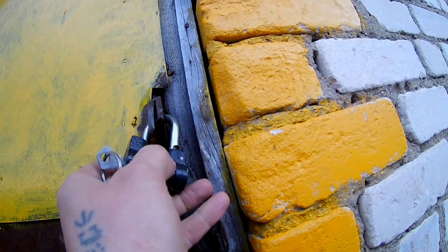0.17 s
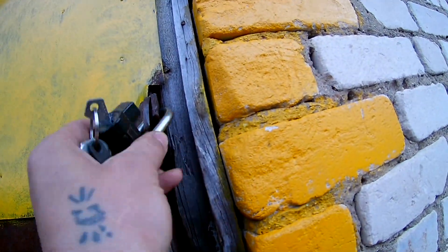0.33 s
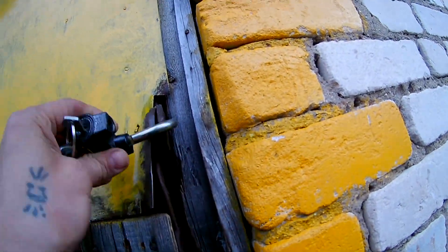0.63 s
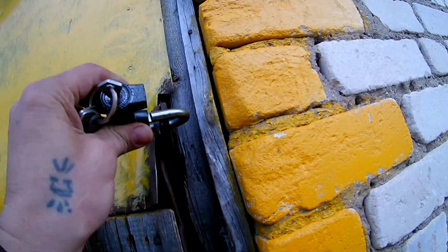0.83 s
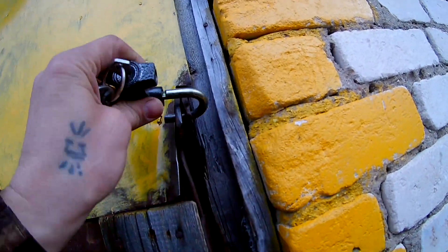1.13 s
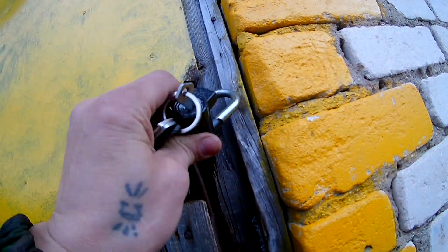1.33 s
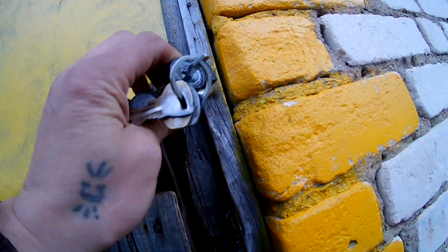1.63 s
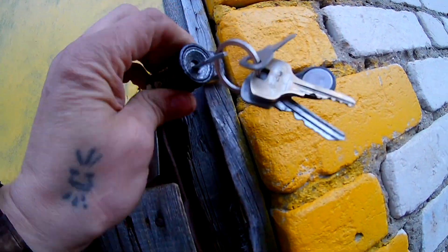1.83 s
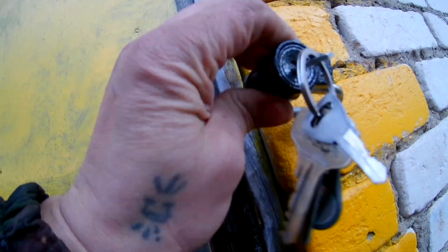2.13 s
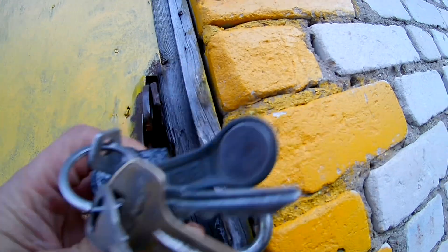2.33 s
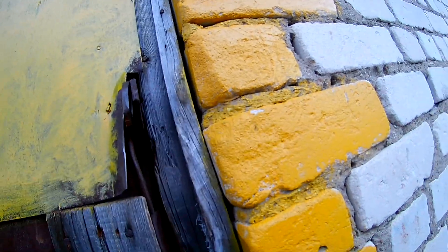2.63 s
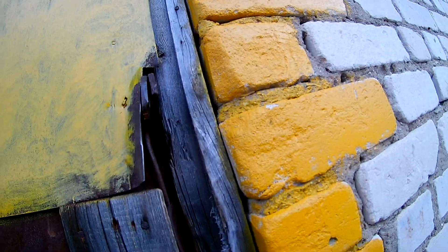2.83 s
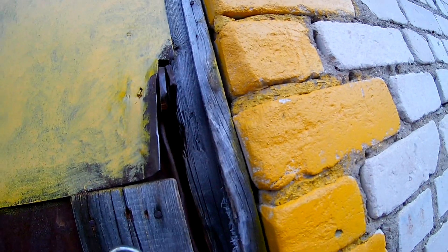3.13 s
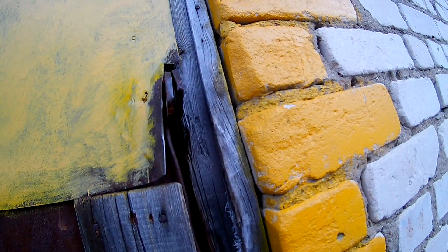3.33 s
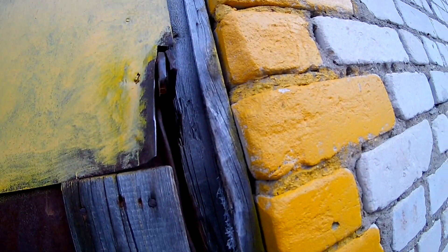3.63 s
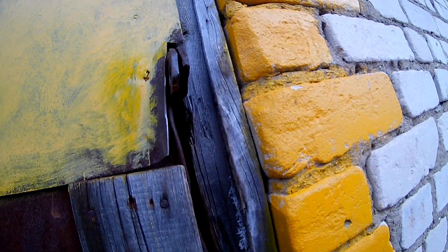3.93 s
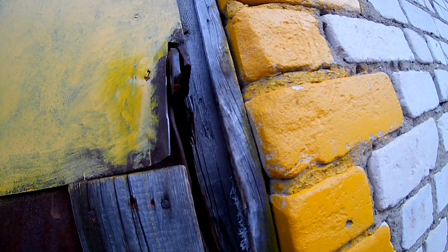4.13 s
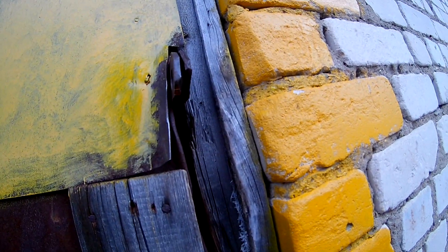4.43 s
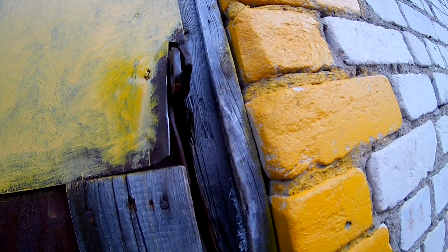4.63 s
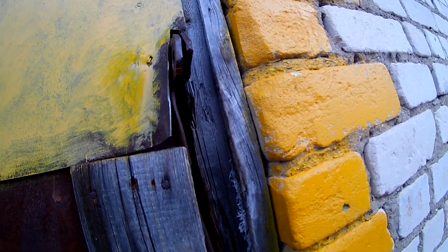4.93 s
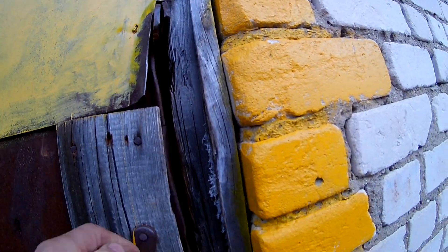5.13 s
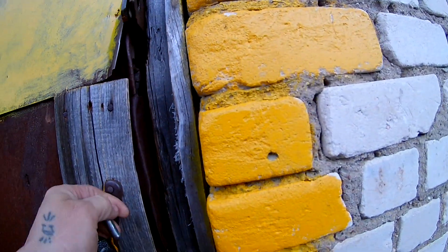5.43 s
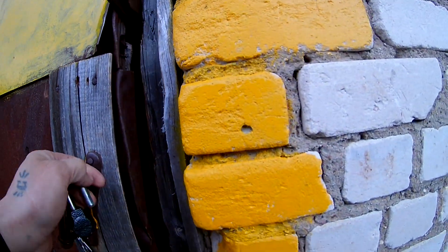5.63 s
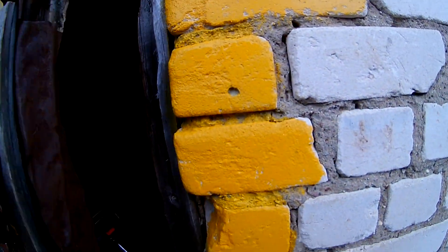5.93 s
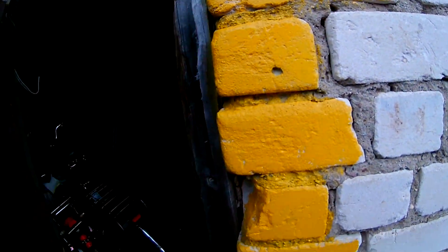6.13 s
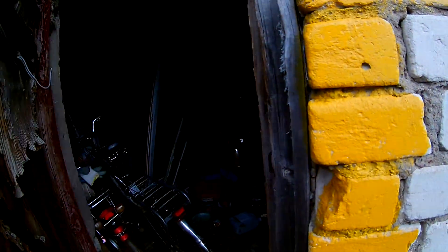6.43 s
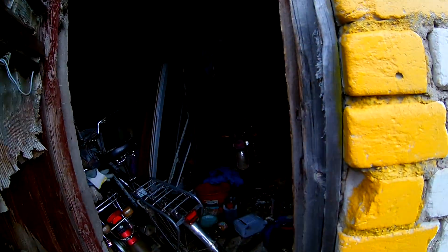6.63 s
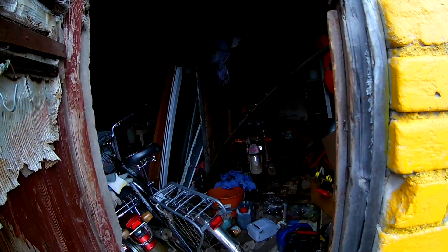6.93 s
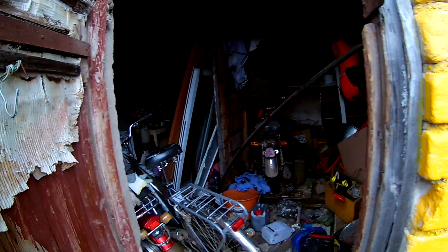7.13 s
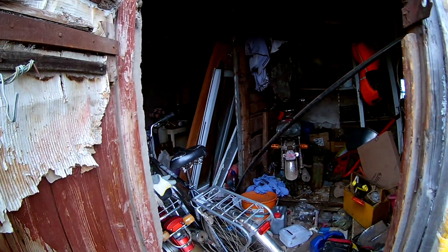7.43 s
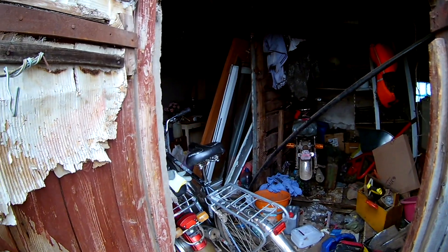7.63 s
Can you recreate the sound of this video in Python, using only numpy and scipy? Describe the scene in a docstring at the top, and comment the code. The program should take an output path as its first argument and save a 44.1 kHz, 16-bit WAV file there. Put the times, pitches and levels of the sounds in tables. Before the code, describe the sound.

A padlock clacks and rattles off a shed door's hasp as keys jingle, then the wooden door is dragged open, with gusts on the microphone.

```python
"""First a hand lifts a padlock off the metal hasp of a wooden shed door, with clacks and jingling keys.
From about 2 s the lock clacks in the hand, and its loose shackle (the metal loop) rings at times.
At 5.5 s the door is dragged open with a groan, two creaks and a bump; after 6 s the open shed echoes.
All along, a brick wall answers the knocks and gusts buffet a small boxed-in microphone,
while a faint hollow tone comes and goes over the far rush of the yard."""
import sys
import numpy as np
from scipy import signal
from scipy.fft import rfft, irfft, next_fast_len
from scipy.io import wavfile
from scipy.ndimage import uniform_filter1d, map_coordinates

SR = 44100
rng = np.random.default_rng(int(sys.argv[2]) if len(sys.argv) > 2 else 0)


def unload_wav(signal):
    """Save mono or channel-first audio to the path in sys.argv[1] as 16-bit WAV at rate SR, clipped to [-1, 1]."""
    wavfile.write(
        sys.argv[1],
        SR,
        np.round(np.clip(np.atleast_2d(signal).T, -1, 1) * 32767).astype(np.int16),
    )


N = 342657

# Knocks of lock, hasp and door: (time [s], level [dB], high clack relative to that level [dB])
HITS = [(0.161, -37, -11), (0.226, -35, -12), (0.246, -31, -7), (0.302, -31, -25), (0.332, -26.5, -18),
        (0.371, -9.5, -16), (0.398, -18, -8), (0.455, -29, -6), (0.498, -18, -13.5), (0.689, -27, -23),
        (0.738, -38.5, -30), (0.945, -45, -3), (0.961, -32, -10), (0.98, -33, -6), (0.99, -22.5, -8),
        (1.015, -12, -13.5), (1.046, -21.5, -10), (1.274, -35, -8), (1.299, -26.5, -47), (1.38, -30.5, -4),
        (1.4, -21.5, -13), (1.411, -31, 5), (1.424, -13.5, -14), (1.459, -25.5, -17), (1.615, -26, -26),
        (1.673, -22, -13), (1.696, -20, -13.5), (1.722, -25, -10), (1.836, -32, -67), (1.883, -26.5, -35),
        (1.968, -29, -18), (1.985, -40, -6), (2.047, -36, -7), (2.064, -27.5, -9), (2.176, -29.5, 1),
        (2.197, -53, -8), (2.252, -41, -5), (2.496, -33.5, -1), (2.648, -30, 8.5), (2.671, -29, -22),
        (3.316, -8.5, -6), (3.379, -24, -14), (3.41, -17, -22), (3.437, -29.5, -11), (3.451, -32.5, -10),
        (3.548, -23.5, -15), (3.557, -18, -15), (3.593, -17, -14.5), (3.616, -39, -3), (3.633, -43, -10),
        (3.653, -18.5, -8.5), (3.662, -16.5, -4.5), (3.826, -40, -7), (3.842, -16.5, -4.5),
        (3.974, -30, -13), (4.355, -25, -12), (4.393, -13, 0.5), (4.411, -15, -11), (4.473, -30, -10.5),
        (4.553, -31.5, -3.5), (4.608, -27, -6), (4.626, -21, -11.5), (4.651, -16, -10),
        (4.705, -30.5, -4.5), (4.75, -26, -5), (4.816, -20.5, -17), (4.846, -33, -23), (4.955, -33.5, -1),
        (4.969, -32, -8), (5.003, -19, -32.5), (5.051, -36, -2), (5.071, -28.5, -16.5), (5.109, -25.5, -9),
        (5.325, -14, -11.5), (5.394, -22, -6), (5.434, -26.5, -31), (5.452, -36, -20), (5.538, -22.5, -37),
        (5.778, -17.5, -23), (5.793, -12, -15.5), (5.892, -32, -7.5), (6.066, -37.5, -43.5),
        (6.323, -20, -12), (6.949, -31, -12.5), (7.004, -30, -14.5), (7.124, -43, -5.5),
        (7.31, -42.5, -2.5), (7.47, -45.5, -22)]
# The low thud as the lock goes from hasp to air, hand and door: (time [s], level relative to knock [dB])
THUD_LEVELS = [(0, -13), (1.0, -8), (2.2, -22.5), (2.6, -2), (3.6, -11.5), (4.7, -6.5), (5.2, -14),
               (5.5, -3), (6.4, -7.5)]
# Notes of the lock's body, heard once it is in the hand: (pitch [Hz], width [Hz], level [dB])
LOCK_NOTES = [(1920, 740, 3)]
# Notes of the hasp plate on the planks: (pitch [Hz], width [Hz], level [dB])
HASP_NOTES = [(930, 110, 8), (1280, 90, -3), (1750, 130, -1), (400, 90, -5)]
def knocks():
    """Lock, hasp and planks hit each other and bounce; the low thud lasts longest."""
    times, db, clack_db = np.transpose(HITS)
    thud_db = np.interp(times, *np.transpose(THUD_LEVELS))
    hits = times, rng.random((len(times), 4, 2))  # four random bounces each
    on_hasp = np.interp(np.arange(N) / SR, [2.0, 2.1], [1, 0])
    in_hand = (1 - on_hasp) * (np.arange(N) < 5.5 * SR)  # until the door is pulled
    middle = clacks(hits, db - 4.5, hz=(675, 1620), seconds=(0.00097, 0.02, 0.11),
                    tail_db=-9, bounce_db=-9.5)
    body = clacks(hits, db - 6.5, hz=(1430, 3700), seconds=(0.00027, 0.012, 0.065),
                  tail_db=-9, bounce_db=-6)
    thud = clacks(hits, db + thud_db, hz=(76, 715), seconds=(0.0052, 0.061, 0.32),
                  tail_db=-10.5, bounce_db=-4.5)
    high = clacks(hits, db + clack_db - 6.5, hz=(2020, 5560), seconds=(0.0004, 0.033, 0.08),
                  tail_db=-49, bounce_db=-7)
    top = clacks(hits, db + 1.55 * clack_db - 20, hz=(10000, 12000), seconds=(0.00025, 0.026, 0.023),
                 tail_db=-34.5, bounce_db=-10.5)  # hard hits reach the highest treble
    out = middle * amp(-8 * on_hasp) + thud + high + top
    out += amp(0.4) * resonate(middle * on_hasp, HASP_NOTES)
    out += resonate(body * in_hand, LOCK_NOTES)
    singing = shackle(times, db + clack_db - 9.5)
    t = np.arange(SR // 8) / SR
    plate = [(hz, gain - 6, 2.2 / width) for hz, width, gain in HASP_NOTES]  # narrow notes ring longer
    attack = 1 - np.exp(-t / 0.0024)
    for at, level in zip(times[times < 2], db[times < 2]):  # each blow on the hasp rings the plate
        out[round(at * SR):][:len(t)] += amp(level - 2) * attack * ring(plate, t, spread_db=7)
    rattle = amp(5.5 * wobble(140))  # the loose shackle rattles in its hole
    return out + singing * rattle


# The tone colour of a clack: (frequency [Hz], level [dB])
CLACK_COLOUR = [(60, -39.5), (110, -9.5), (1270, 1.5), (2200, 0), (3800, -8), (5000, -14.5), (6300, -14),
                (9000, -22.5), (12500, -35.5), (15800, -62)]
def clacks(hits, db, hz, seconds, tail_db, bounce_db):
    """One band of noise for every hit and bounce: a quick snap, then a tail from wood and wall."""
    times, bounces = hits
    rise, snap, tail = seconds  # snap and tail: time to fade by 60 dB
    t = np.arange(SR // 3) / SR
    shape = (1 - np.exp(-t / rise)) * np.sqrt(amp(-120 * t / snap) + amp(2 * tail_db - 120 * t / tail))
    late, weak = bounces.T
    bounce_times = times + .004 + .05 * late ** 1.5
    bounce_levels = db + bounce_db - 18 * weak - 8 * late
    power = np.zeros(N + SR)
    for at, level in (times, db), (bounce_times, bounce_levels):
        power += np.bincount(np.round(at * SR).astype(int).ravel(), amp(2 * level).ravel(), N + SR)
    loudness = np.sqrt(np.abs(signal.fftconvolve(power[:N], shape ** 2)[:N]))
    colour = lambda f: band(*hz)(f) * amp(along(CLACK_COLOUR, f))
    hiss = rng.standard_normal(N)
    return filtered(loudness * hiss, colour) / np.std(filtered(hiss, colour))


# Notes of the shackle: (pitch [Hz], level [dB], fade time [s])
SHACKLE_NOTES = [(3978, 0, .06), (6280, -17, .07), (8310, -25, .07)]
# When the shackle hangs loose: (start [s], end [s])
LOOSE_TIMES = [(3.35, 3.7), (4.3, 5.15)]
def shackle(times, db):
    """While it hangs loose, the shackle rings at every knock."""
    out, t = np.zeros(N + SR), np.arange(SR // 8) / SR
    loose = np.any([(times > start) & (times < end) for start, end in LOOSE_TIMES], 0)
    for at, level in zip(times[loose], db[loose]):
        out[round(at * SR):][:len(t)] += amp(level) * ring(SHACKLE_NOTES, t, spread_db=5)
    return out[:N]


# Notes of the long, flat, small and brass keys, one list each: (pitch [Hz], level [dB], fade time [s])
KEY_NOTES = [
    [(11430, -6, .4), (11640, 0, .4), (12080, -5, .3)],
    [(8312, -6, .15), (8590, -3, .2), (6934, -13, .2)],
    [(9630, 1, .15)],
    [(5760, -4, .2), (5265, -10, .15), (4440, -9, .15), (3130, -7, .1), (2000, -5, .08)],
]
# Keys that are only shaken, not struck: (key name, level relative to the long key [dB])
SHAKEN_KEYS = {"flat": -11, "small": -14, "brass": -9}
# Touches of the long key: (time [s], level [dB], what it meets, time until it is muffled [s])
KEY_TOUCHES = [(0.422, -57.5, "small", 0.054), (.465, -53.5, "brass", 0.0092), (.508, -67, "flat", .024),
               (1.531, -60.5, "brass", 0.027), (1.782, -56.5, "brass", 0.14),
               (1.878, -54.5, "brass", 0.075), (1.909, -45, "flat", .056), (1.968, -46.5, "brass", 0.024),
               (2.01, -53.5, "flat", 0.12), (2.06, -36, "ring", 0.016), (2.082, -42, "flat", 0.051),
               (2.211, -49.5, "ring", 0.012), (2.4, -59, "ring", 0.037), (2.468, -46, "flat", 0.096),
               (2.498, -37, "small", 0.027), (2.596, -60, "brass", 0.013), (4.855, -57.5, "flat", 0.058),
               (4.961, -53.5, "flat", 0.061), (5.157, -60, "ring", 0.05), (5.488, -58, "brass", .07)]
def keys(struck_db=5):
    """Each touch ticks and rings the keys, and three weaker touches follow."""
    out, t = np.zeros(N + SR), np.arange(SR // 7) / SR
    for start, db, met, life in KEY_TOUCHES:
        key_dbs = [0] + [struck_db if key == met else shaken for key, shaken in SHAKEN_KEYS.items()]
        for turn, (wait, weak) in enumerate(rng.random((4, 2))):
            dull_noise = uniform_filter1d(rng.standard_normal(len(t)), size=5)
            tick = amp(15.5 - 60 * t / 0.0056) * dull_noise  # flat faces meet
            tones = sum(amp(gain) * ring(notes, t, spread_db=5, life=life * (.4 + .6 * wait))
                        for notes, gain in zip(KEY_NOTES, key_dbs))
            level = db - 5 - (turn > 0) * (3 + 8 * weak)
            at = start + turn * (.004 + .4 * life * wait)
            out[round(at * SR):][:len(t)] += amp(level) * (tones * amp(-4 * turn) + tick)
    flutter = amp(3 * wobble(110))  # a fast random flutter roughens the keys' ringing
    return filtered(out[:N] * flutter, band(1600, 11000))


# The jolts in which the door breaks free: (time [s], level [dB])
DOOR_JOLTS = [(5.545, -31), (5.6, -36.5)]
def door(rise_s=0.011, jolt_fade_s=0.16, groan_db=-11, groan_fade_s=1.14):
    """The planks shudder on two low notes: each jolt rises, drops quickly and groans on."""
    loudness = np.zeros(N)
    for at, db in DOOR_JOLTS:
        t = np.arange(N) / SR - at
        before, after = np.minimum(t, 0), np.maximum(t, 0)
        fade = amp(-60 * after / jolt_fade_s) + amp(groan_db - 60 * after / groan_fade_s)
        loudness += amp(db) * np.exp(-(before / rise_s) ** 2) * fade
    return loudness * noise(lambda f: peak(f, 76, 14) + 0.6 * peak(f, 200, 45))


# Creaks of metal and hinge: (middle [s], half length [s], pitch [Hz], level [dB])
CREAKS = [(5.603, 0.012, 4160, -44), (5.691, 0.014, 2320, -38.5)]
def creaks():
    """Short uneven slips sing on a blurred pitch and on two and three times that pitch."""
    out = np.zeros(N)
    for at, half, hz, db in CREAKS:
        colour = lambda f: sum(amp(gain) * peak(f, k * hz, .045 * k * hz)
                               for k, gain in enumerate([0, -18, -20], 1))
        out += amp(db) * swell(at, half) * rubbing(300, colour)
    return filtered(out, band(300, 6800))  # the planks swallow the top of each creak


# The rustle of hand and sleeve: (time [s], level [dB])
RUSTLE_LEVELS = [(0, -53.5), (.2, -53), (.9, -62.5), (1.9, -48), (2.3, -61.5), (3.2, -65.5), (5.2, -53),
                 (6.7, -62.5), (7.77, -60)]
# The tone colour of the low rustle: (frequency [Hz], level [dB])
RUSTLE_COLOUR = [(100, -3.5), (170, 3.5), (800, 1.5), (1450, -6), (2280, -10), (3000, -38), (6000, -104)]
# Scrapes of metal and wood: (middle [s], half length [s], low rustle [dB], high rasp [dB])
SCRAPES = [(0.09, 0.41, -63, -64.5), (0.738, 0.09, -56, -75.5), (1.008, 0.022, -28, -45),
           (1.256, 0.028, -48, -66.5), (1.371, 0.02, -40, -65), (4.143, 0.022, -38.5, -62),
           (4.243, 0.02, -36.5, -46.5), (4.964, 0.022, -39.5, -45), (5.605, 0.022, -40, -46),
           (5.696, 0.063, -44.5, -57.5), (5.794, 0.14, -42, -65), (7.328, 0.02, -57, -62)]
def handling():
    """Hand and sleeve rustle, and scrapes swell and fade with each stroke."""
    rustle = loudness_curve(RUSTLE_LEVELS)
    rasp = rustle * amp(-22.5)
    for at, half, rustle_db, rasp_db in SCRAPES:
        rustle += amp(rustle_db) * swell(at, half)
        rasp += amp(rasp_db) * swell(at, half)
    rasp_colour = lambda f: (band(2000, 4600)(f) ** 4 + .1 * band(5300, 7300)(f) ** 3
                             + .8 * peak(f, SHACKLE_NOTES[0][0], 90))  # the shackle colours the rasp
    rustle *= rubbing(120, lambda f: amp(along(RUSTLE_COLOUR, f)))
    return rustle + rasp * rubbing(210, rasp_colour, smooth=0.34)


def rubbing(slips_per_s, colour, smooth=2.6):
    """Surfaces catch and let go in tiny slips, which makes their noise rough."""
    slips = (rng.random(N) < slips_per_s / SR) * amp(9.9 * rng.random(N))
    fade = amp(-60 * np.arange(SR // 20) / SR / 0.041)
    loudness = (smooth + signal.fftconvolve(slips, fade)[:N]) * amp(3.5 * wobble(25))
    return unit(filtered(loudness * rng.standard_normal(N), colour))


def shed_echo(hits, open_s=6, fade_s=0.17):
    """The open shed makes the last knocks ring on."""
    t = np.arange(SR // 4) / SR
    room = amp(-60 * t / fade_s) * rng.standard_normal(len(t))
    echo = signal.fftconvolve(hits * (np.arange(N) > open_s * SR), room)[:N]
    return amp(-27) * filtered(echo, band(600, 5400))


# The strength of the gusts: (time [s], level [dB])
GUST_LEVELS = [(0.0, -66), (1.7, -49.5), (2.21, -50), (3.3, -58.5), (4.2, -47), (4.6, -49.5), (5.49, -50.5),
               (5.58, -66), (6.3, -39), (6.6, -48.5), (7.77, -69)]
# The tone colour of the gusts: (frequency [Hz], level [dB])
GUST_COLOUR = [(15, 3), (35, 7.5), (70, 2.5), (130, -1.5), (300, -65.5)]
def wind():
    """Gusts hit the microphone with a lumpy rumble."""
    lumps = amp(3.5 * wobble(11))
    rumble = noise(lambda f: amp(along(GUST_COLOUR, f)))
    return loudness_curve(GUST_LEVELS) * unit(lumps * rumble)


# A faint hollow tone: (middle [s], half length [s], pitch [Hz], level [dB])
HOLLOW_TONES = [(2.39, 0.03, 730, -52.5), (2.52, 0.076, 733, -50), (3.064, 0.063, 734, -51.5),
                (4.027, 0.043, 753, -48.5), (0.012, 0.033, 890, -45.5)]
# The tone colour of the far rush and the microphone's hiss: (frequency [Hz], level [dB])
YARD_COLOUR = [(35, -24), (60, -1.5), (96, -12), (146, 8), (267, -15), (467, -4.5), (745, -5), (897, -5.5),
               (1810, -12.5), (3160, -24), (7850, -31.5), (15800, -31.5)]
def yard():
    """A steady far rush, with a hollow tone that comes and goes."""
    out = amp(-62.5) * noise(lambda f: amp(along(YARD_COLOUR, f)))
    for at, half, hz, db in HOLLOW_TONES:
        out += amp(db) * swell(at, half) * noise(lambda f: peak(f, hz, 45))
    return out


def ring(notes, t, spread_db, life=1):
    """Struck metal: each note starts at a random strength, fades and is muffled after about life s."""
    draws = rng.standard_normal((len(notes), 2))
    out = 0
    for (hz, db, fade_s), (strength, stretch) in zip(notes, draws):
        muffle = 1 + (t / max(life, .005) / amp(0.374 * stretch)) ** 6
        out += amp(db + spread_db * strength - 60 * t / fade_s) * np.sin(2 * np.pi * hz * t) / muffle
    return out


def resonate(x, notes):
    """An object passes on the parts of a sound that lie near its own notes."""
    return filtered(x, lambda f: sum(amp(db) * 1j * f * width / (hz * hz - f * f + 1j * f * width)
                                     for hz, width, db in notes))


def amp(db):
    """Turns decibels into a multiplier."""
    return 10 ** (np.asarray(db) / 20)


def unit(x):
    """Scales a sound to an average (rms) level of 1."""
    return x / np.sqrt(np.mean(x ** 2) + 1e-20)


def along(points, hz):
    """Reads between (frequency, level) points on a log frequency scale."""
    freqs, levels = np.transpose(points)
    return np.interp(np.log(hz + 1), np.log(freqs + 1), levels)


def loudness_curve(points):
    """Joins (time, level) points into one multiplier per sample."""
    return amp(np.interp(np.arange(N) / SR, *np.transpose(points)))


def swell(at, half):
    """A smooth rise and fall around a moment."""
    return np.exp(-((np.arange(N) / SR - at) / half) ** 2)


def wobble(rate):
    """A smooth curve through rate random points a second."""
    return map_coordinates(rng.standard_normal(int(N * rate / SR) + 4), [np.arange(N) * rate / SR])


def filtered(x, colour):
    """Multiplies each frequency f in a sound by colour(f)."""
    size = next_fast_len(N + SR // 2)
    return irfft(rfft(x, size) * colour(np.fft.rfftfreq(size, 1 / SR)), size)[:N]


def band(lo_hz, hi_hz):
    """Keeps a range of frequencies, with soft edges."""
    return lambda f: 1 / np.sqrt((1 + (lo_hz / (f + 1)) ** 6) * (1 + (f / hi_hz) ** 6))


def peak(f, hz, half_width):
    """A hump around one frequency."""
    return 1 / (1 + ((f - hz) / half_width) ** 2)


def noise(colour):
    """Noise with a tone colour, at level 1."""
    return unit(filtered(rng.standard_normal(N), colour))


def scene():
    """Adds it all up; the microphone's box cancels a narrow band of treble in the near sounds."""
    hits = knocks()
    near = hits + shed_echo(hits) + keys() + handling() + creaks() + door()
    boxed = filtered(near, lambda f: 1 - peak(f, 7950, 300))
    return (boxed + wind() + yard())[None]


def record(dry):
    """The recorder keeps nothing above 15830 Hz."""
    return filtered(dry[0], lambda hz: hz < 15830)[None]


dry = scene()
out = record(dry)
unload_wav(out)
```